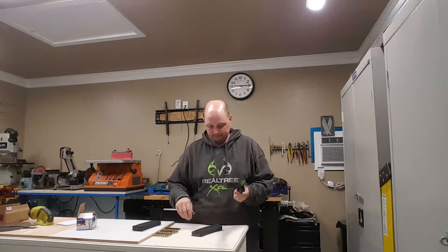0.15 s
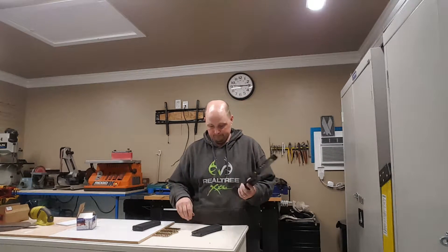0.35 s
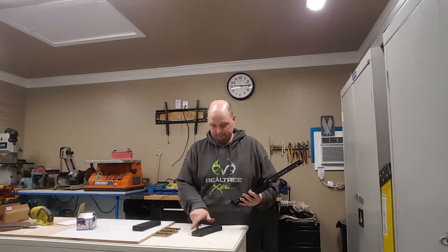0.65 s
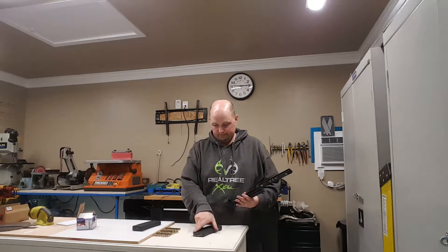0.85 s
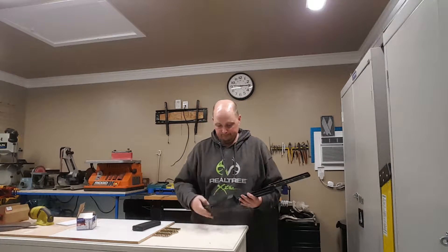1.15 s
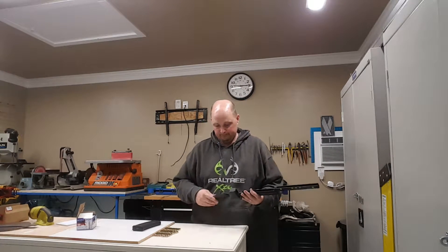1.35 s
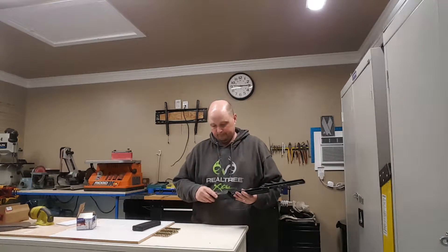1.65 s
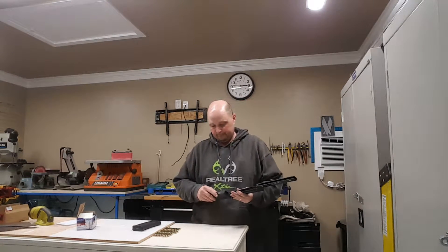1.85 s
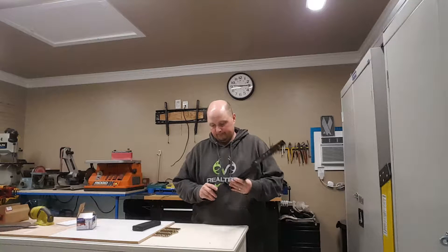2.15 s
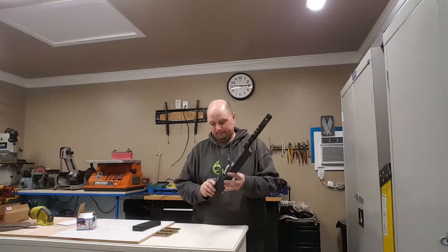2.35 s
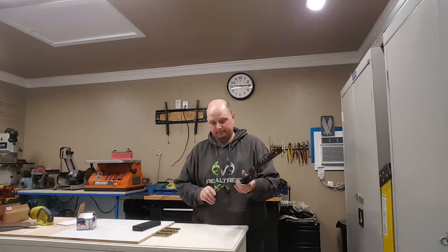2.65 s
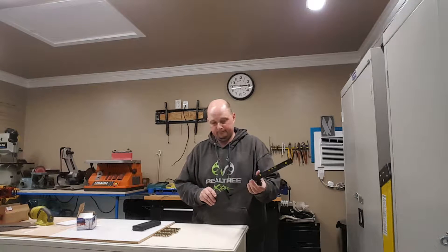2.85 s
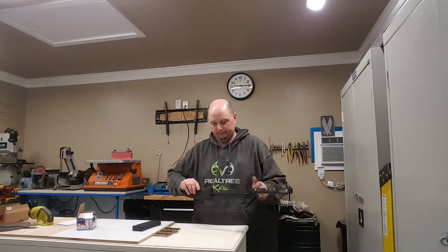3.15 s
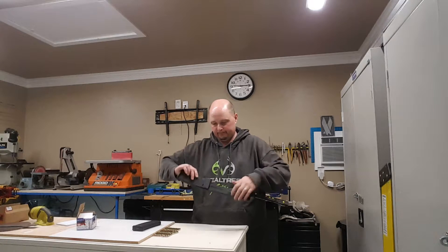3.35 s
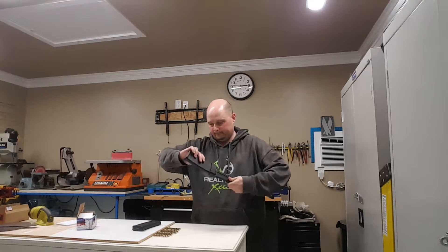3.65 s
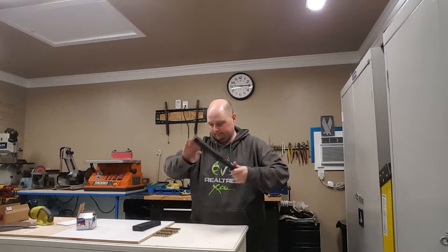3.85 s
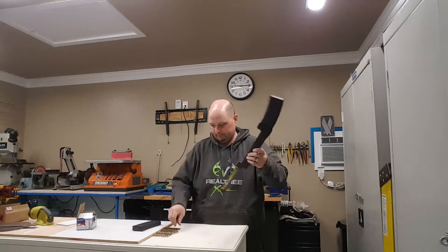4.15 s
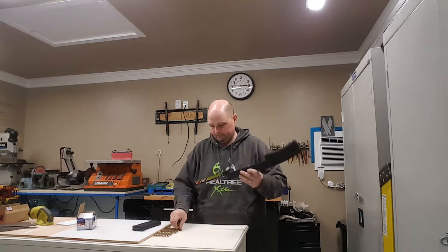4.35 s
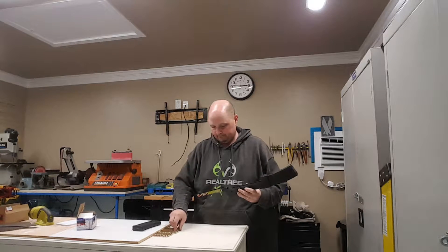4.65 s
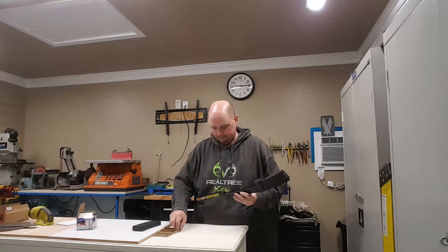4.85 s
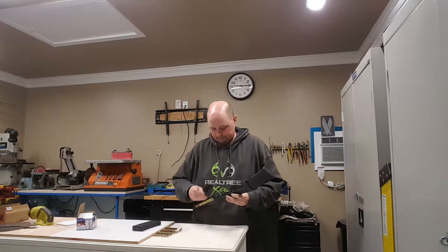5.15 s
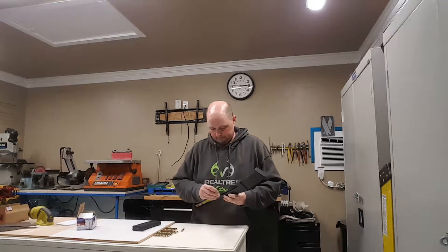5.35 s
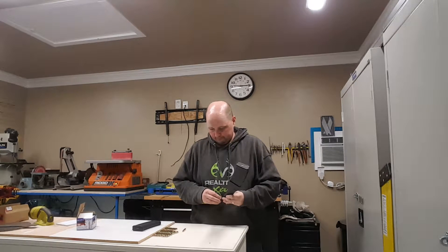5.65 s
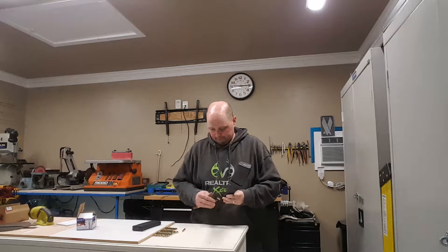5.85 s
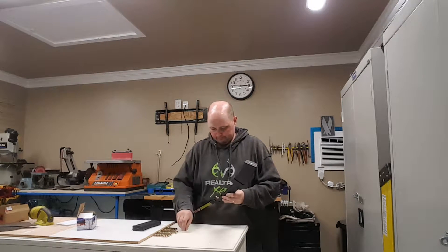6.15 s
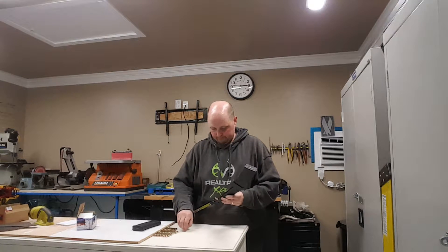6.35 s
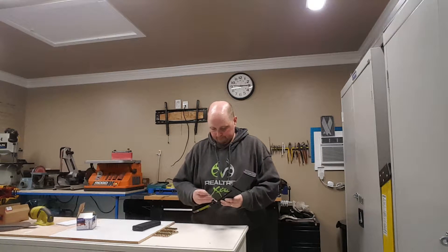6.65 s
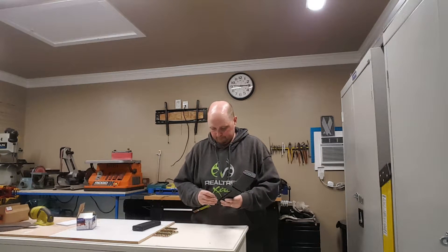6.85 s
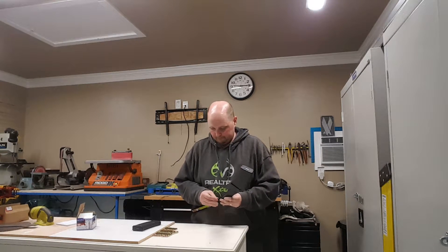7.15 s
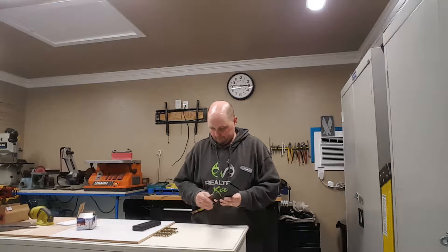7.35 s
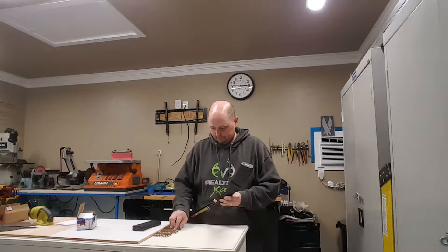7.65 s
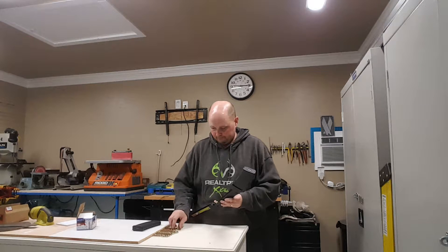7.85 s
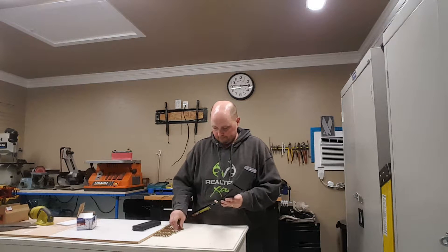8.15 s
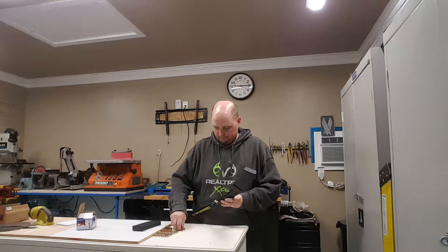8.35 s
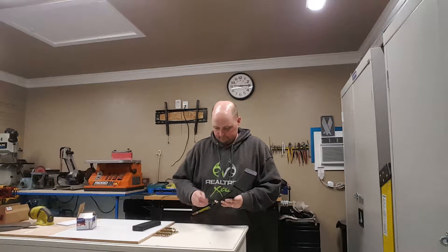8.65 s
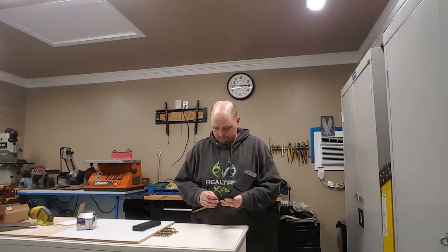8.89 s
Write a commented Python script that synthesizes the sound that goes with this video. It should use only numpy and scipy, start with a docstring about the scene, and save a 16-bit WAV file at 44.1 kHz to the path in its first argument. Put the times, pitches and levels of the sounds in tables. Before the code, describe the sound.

A rifle magazine clacks and scrapes as brass cartridges are snapped in by hand, with knocks and clinks on a workbench in a reverberant garage.

```python
"""Loading a rifle magazine in a garage

A rifle magazine is picked off a workbench, handled and loaded with brass cartridges, a few steps away.
It clacks and scrapes, rounds snap under the feed lips, loose rounds clink and knock on the bench top.
Noise bursts ring resonant bodies; a hard-walled garage rings after every contact, over a faint hum."""
import sys
import numpy as np
from scipy import signal
from scipy.fft import rfft, irfft, next_fast_len
from scipy.io import wavfile
from scipy.ndimage import map_coordinates

SR = 44100
rng = np.random.default_rng(int(sys.argv[2]) if len(sys.argv) > 2 else 0)


def inscribe(sig):
    """Save sig as 16-bit PCM at rate SR to the path in sys.argv[1].

    A 1-D sig is mono; a 2-D sig holds one channel per row.
    Samples are clipped to [-1, 1] before scaling.
    """
    pcm = np.round(np.clip(np.atleast_2d(sig).T, -1, 1) * 32767)
    wavfile.write(sys.argv[1], SR, pcm.astype(np.int16))


N = 397782
LN_60DB = np.log(1000)  # decay exponent over one t60


def amp(db):
    """Decibels to amplitude ratio."""
    return 10 ** (np.asarray(db) / 20)


def unit(x):
    """Scale to rms 1."""
    return x / np.sqrt(np.mean(x ** 2) + 1e-20)


def along(points, hz):
    """Interpolate (hz, value) points on a log frequency axis."""
    point_hz, value = np.transpose(points)
    return np.interp(np.log(hz + 1), np.log(point_hz + 1), value)


def filtered(x, response):
    """Apply a frequency-dependent gain to x."""
    n = x.shape[-1]
    padded = next_fast_len(n + SR // 10)
    hz = np.fft.rfftfreq(padded, 1 / SR)
    return irfft(rfft(x, padded) * response(hz), padded)[..., :n]


def add(track, start_s, sound):
    """Mix a stereo sound into the track at start_s."""
    start = max(0, round(start_s * SR))
    target = track[:, start:start + sound.shape[1]]
    target += sound[:, :target.shape[1]]


# left-right likeness of diffuse sound: freq_hz, coherence (0-1)
LIKENESS = [(60, 1), (150, 0.85), (280, .68), (550, 0.39), (1000, 0.11), (16000, 0.023)]


def diffuse(n):
    """Noise from all sides: alike at both microphones in the bass, unrelated in the treble."""
    def mid_side_gain(hz):
        likeness = along(LIKENESS, hz)
        return np.sqrt([(1 + likeness) / 2, (1 - likeness) / 2])

    mid, side = filtered(rng.standard_normal((2, n)), mid_side_gain)
    return np.array([mid + side, mid - side])


# room tone colour: freq_hz, relative_db
AIR_COLOUR = [(25, -17.5), (40, -8.5), (70, 7), (100, -6), (150, -0.5), (250, -6), (400, -4), (630, -8),
              (1000, -9.5), (1500, -7.5), (2000, -10.5), (3200, -11.5), (8000, -20.5), (16000, -26)]
# appliance hum partials: freq_hz, mean_level_db (rms)
HUM_PARTIALS = [(56, -66), (120, -75.5), (241, -69.5), (280, -74.5)]


def room_tone(air_db=-66):
    """Still air as coloured diffuse noise; appliance hum as sines wavering in level and phase."""
    t = np.arange(N) / SR
    air = unit(filtered(diffuse(N), lambda hz: amp(along(AIR_COLOUR, hz))))

    def waver():
        return map_coordinates(rng.standard_normal(SR // 100), [t * 6])  # 6 random points per second

    hum = np.zeros(N)
    for freq_hz, level_db in HUM_PARTIALS:
        level = np.sqrt(2) * amp(level_db + 0.56 * waver())
        hum += level * np.sin(2 * np.pi * freq_hz * t + 0.65 * waver())
    return amp(air_db) * air + hum


# garage reverberation: freq_hz, t60_s
REVERB = [(100, 0.7), (400, 0.57), (1050, 0.59), (2800, 0.54), (7000, 0.46), (11000, 0.31), (16000, .27)]
# early reflections: mean_delay_s, level_db (re direct sound)
REFLECTIONS = [(.0048, 1.5), (0.0195, -6), (0.0246, -12), (.032, -14.5)]
PORT_LAG_S = .00005  # direct sound is later at the right port, to the nearest sample


def garage(force, direct_db, build_s=0.0032):
    """Stereo paths to the microphones: direct force, near-surface reflections, decaying diffuse tail."""
    hz, t, bins = signal.stft(diffuse(SR * 3 // 4), SR, nperseg=256)
    t60_s = along(REVERB, hz)[:, None]
    decay = np.exp(-LN_60DB * t / t60_s)
    energy_norm = np.sqrt(2 * LN_60DB / t60_s / SR)
    tail = signal.istft(bins * decay * energy_norm, SR, nperseg=256)[1]
    tail *= 1 - np.exp(-np.arange(tail.shape[1]) / SR / build_s)

    early = np.zeros_like(tail)
    early[[0, 1], [0, round(PORT_LAG_S * SR)]] = 1
    for delay_s, level_db in REFLECTIONS:
        arrival = (delay_s + rng.normal(0, .0002, 2)) * SR  # separate arrival at each port
        early[[0, 1], arrival.astype(int)] += amp(level_db)
    direct = signal.fftconvolve(early, force[None], axes=1)[:, :tail.shape[1]]
    return tail + amp(direct_db) * direct


def body(spectrum, modes, tilt, size=8192):
    """Minimum-phase response of an object: broad colour with resonant peaks, tilted by the contact."""
    hz = np.fft.rfftfreq(size, 1 / SR)
    peaks = np.ones(len(hz))
    for mode_hz, width_hz, level_db in modes:
        peaks += amp(level_db) ** 2 / (1 + (2 * (hz - mode_hz) / width_hz) ** 2)
    colour = amp(along(spectrum, hz) + along(tilt, hz))
    cepstrum = irfft(np.log(colour * np.sqrt(peaks) + 1e-6))
    # fold the cepstrum so that the response is causal
    cepstrum[1:size // 2] *= 2
    cepstrum[size // 2 + 1:] = 0
    return irfft(np.exp(rfft(cepstrum)))


def excited(modes, pitch_hz, pitch_db, spread_db, width=0.12):
    """Modes one contact wakes: each at a new strength, plus a resonance of the touched part."""
    woken = [(hz, width_hz, db + rng.normal(0, spread_db)) for hz, width_hz, db in modes]
    return woken + [(pitch_hz, width * pitch_hz, pitch_db)]


def strike(response, chatter_s, direct_db, spiky=0.94):
    """One contact: dying micro-impacts (t60 chatter_s) ring an object; longer chatter fills the room later."""
    t = np.arange(SR // 25) / SR
    spikes = np.exp(spiky * rng.standard_normal(len(t)) - LN_60DB * t / chatter_s)
    force = rng.standard_normal(len(t)) * spikes
    force *= 1 - np.exp(-t / (0.085 * chatter_s))  # longer contacts close more softly
    path = garage(force / np.linalg.norm(force), direct_db, build_s=0.00086 + 0.18 * chatter_s)
    return signal.fftconvolve(response[None], path, axes=1)


def rub(strokes, response, grain_db, grain_hz, swell_db, fade):
    """Friction: tiny uneven slips ring an object; level drifts by swell_db, a share of each stroke fades."""
    out = np.zeros((2, N))
    for start_s, end_s, level_db in strokes:
        n = max(int((end_s - start_s) * SR), SR // 100)
        t = np.arange(n) / SR
        grain = map_coordinates(rng.standard_normal(SR // 10), [t * grain_hz], order=1)
        slips = unit(rng.standard_normal(n) * amp(grain_db * grain))
        level = amp(level_db + swell_db * np.linspace(-.5, .5, n))
        force = slips * level * signal.windows.tukey(n, fade)
        rung = signal.fftconvolve(force, response)
        path = garage(np.ones(1), direct_db=-2.5)
        add(out, start_s, signal.fftconvolve(rung[None], path, axes=1))
    return out


# magazine shell colour: freq_hz, level_db
SHELL_COLOUR = [(100, -23.5), (300, -17), (600, -12), (950, 0), (1350, 2), (1700, -2), (3200, 1),
                (4500, -5), (7000, -12.5), (11000, -22), (16000, -32)]
# magazine shell resonances: freq_hz, width_hz, mean_level_db
SHELL_RESONANCES = [(438, 21, 1.1), (913, 15, 3.3), (988, 10, 3.9), (1147, 6.1, 1.6), (1287, 16, 1.4),
                    (2100, 19, 1.6), (2390, 39, 1.5), (2610, 84, 4.6), (2788, 47, 2.8), (2965, 24, 3),
                    (3320, 18, 1), (3680, 11, 0.67), (3880, 58, 2.7), (4110, 41, 2.7), (5030, 8.3, 1.7),
                    (6030, 97, 3)]
HOLLOW_PER_DB = -0.55  # 2 kHz gain (dB) per dB of thud: deeper is hollower


def shell(thud_db, bite_db, edge_db, pitch_hz):
    """The magazine's answer to one contact: its resonances tilted by thud, bite and edge."""
    tilt = [(150, 0.15 * thud_db), (450, thud_db), (850, 0.019), (1500, 0.0022),
            (2000, HOLLOW_PER_DB * thud_db), (3200, bite_db), (8500, edge_db)]
    modes = excited(SHELL_RESONANCES, pitch_hz, pitch_db=4.5, spread_db=2.2)
    return body(SHELL_COLOUR, modes, tilt)


# bench top colour: freq_hz, level_db
BENCH_COLOUR = [(35, -41), (62, -4), (95, -7.5), (220, -8.5), (330, -3.5), (600, -2.5), (1450, -2),
                (1750, -15), (2200, -7), (3200, -10.5), (5000, -19), (9000, -34.5), (16000, -56.5)]
# bench top resonances: freq_hz, width_hz, mean_level_db
BENCH_RESONANCES = [(158, 9.9, 13.6), (231.5, 12.5, 18.6), (304, 16, 6.2), (440, 11, 8.7), (879, 18, 6.6),
                    (1034, 4.8, 8.8), (1390, 3.5, 1.2), (1546, 41, 7.4), (1985, 86, 8.6)]
# things dragged over the bench: start_s, end_s, level_db
BENCH_DRAGS = [(.94, 1.055, -24.5), (4.35, 4.53, -44.5), (4.87, 5.06, -35), (7.72, 7.87, -29.5),
               (7.98, 8.08, -28), (8.16, 8.39, -31.5)]
# palm sliding along the magazine: start_s, end_s, level_db
PALM_SLIDES = [(.92, 1.02, -47), (1.33, 1.45, -62.5), (1.795, 1.87, -40.5), (2.225, 2.27, -51),
               (2.33, 2.38, -54), (2.63, 2.76, -42.5), (3.56, 3.85, -60.5), (4.05, 4.2, -65.5)]


def handling():
    """Friction rings the bench top under dragged things, and the shell under the sliding palm."""
    top = body(BENCH_COLOUR, BENCH_RESONANCES, [(90, -11.5), (250, -5.5), (1200, -1.5), (5000, -9)])
    skin = body(SHELL_COLOUR, SHELL_RESONANCES, [(1000, 6.5), (3500, -0.5), (11000, 15.0)])
    drag = rub(BENCH_DRAGS, top, grain_db=3, grain_hz=142, swell_db=1.5, fade=0.26)
    slide = rub(PALM_SLIDES, skin, grain_db=4.5, grain_hz=213, swell_db=-1.5, fade=.45)
    return drag + slide


# magazine, fingers and rounds meeting the bench:
# time_s, level_db, thud_db, hardness_db, pitch_hz (touched part)
BENCH_KNOCKS = [(0.744, -16, 12.5, -17, 228), (0.836, 6, 11, -10, 457), (.852, 14, 1, 5.5, 845),
                (0.961, -18, 5, -2, 1520), (1.004, 8, 2, 1, 1060), (4.302, -9, 12, -3, 435),
                (4.555, 6.5, -9, -1.5, 2880), (4.798, -10.5, 11.5, 0, 428), (4.922, 0, 3, -4, 970),
                (5.046, 5.5, 3.5, 1, 840), (5.0641, 20.5, -7.5, 6.5, 1810), (6.139, 9.5, 4, -9.5, 1950),
                (6.344, -2.5, 7, 0, 441), (6.414, 8.5, -11.5, -1, 1990), (7.703, 5.5, 4, 7, 2760),
                (7.786, 16, -7.5, 1, 2440), (7.925, 2, 16.5, 1, 304), (8.004, 0, -6, 6, 1040),
                (8.237, 6, 2.5, -1, 675), (8.3, 6.5, 3.5, 5.5, 2670)]
KNOCK_CHATTER_S = 0.016
KNOCK_MID_DB, KNOCK_EDGE_DB = 0.5, -2  # at 800 Hz; at 6 kHz re hardness
SETTLE_S, SETTLE_DB = .03, -8.5  # hand comes to rest after each knock


def bench(level_db=-2):
    """Fingers thump the bench top, brass and the magazine rap on it; a softer contact follows each."""
    out = np.zeros((2, N))
    for time_s, knock_db, thud_db, hardness_db, pitch_hz in BENCH_KNOCKS:
        tilt = [(260, thud_db), (800, KNOCK_MID_DB), (2000, 0),
                (2900, hardness_db), (6000, hardness_db + KNOCK_EDGE_DB)]
        for delay_s, loss_db in [(0, 0), (SETTLE_S, SETTLE_DB)]:
            modes = excited(BENCH_RESONANCES, pitch_hz, pitch_db=6.5, spread_db=1.2)
            top = body(BENCH_COLOUR, modes, tilt)
            knock = strike(top, KNOCK_CHATTER_S, direct_db=-12.0)
            add(out, time_s + delay_s, amp(knock_db + loss_db + level_db) * knock)
    return out


# cartridge case colour: freq_hz, level_db
CASE_COLOUR = [(1000, -6.5), (3500, -8.5), (7500, -2), (9500, -8), (16000, -15)]
# cartridge case modes: nominal_hz, width_hz, base_level_db
CASE_MODES = [(7700, 230, 7.3), (8110, 140, 19.3), (8300, 120, 8.6), (12000, 80, 8.2), (12290, 95, 9.2),
              (16000, 330, 9)]
# brass against brass: time_s, level_db, ring_db, upper_modes_db
CASE_CLINKS = [(4.335, -10, 0, 1), (4.381, -3.5, -5.5, -3), (4.48, -13.5, -4, -5), (4.568, -6, -11, 29.5),
               (4.923, 3, -9, -2), (5.066, 0.5, -3, -3), (7.706, -13, 3.5, -15), (7.978, -2, -1, -4),
               (8.1143, 10, -8.5, 9)]
CASE_SPREAD = 0.005  # relative tuning deviation between clinks (standard deviation)
CLINK_BRIGHT_DB, BRIGHT_PER_RING = 1, 0.96  # 11.5 kHz: offset, dB per dB of ring


def cartridges(level_db=-2):
    """Loose cases touch and ring high and thin; the point of contact decides which modes speak."""
    out = np.zeros((2, N))
    for time_s, clink_db, ring_db, upper_db in CASE_CLINKS:
        tune = 1 + rng.normal(0, CASE_SPREAD)
        modes = []
        for nominal_hz, width_hz, mode_db in CASE_MODES:
            mode_db = mode_db + ring_db + upper_db * (nominal_hz > 10000) + rng.normal(0, 0.67)
            modes.append((nominal_hz * tune, width_hz, mode_db))
        tilt = [(8400, 0), (11500, CLINK_BRIGHT_DB + BRIGHT_PER_RING * ring_db)]
        clink = strike(body(CASE_COLOUR, modes, tilt), chatter_s=0.017, direct_db=-7.5)
        add(out, time_s, amp(clink_db + level_db) * clink)
    return out


# magazine against hand, part or round:
# time_s, level_db, thud_db, brightness_db, pitch_hz (touched part), rebound_db
MAGAZINE_CLACKS = [(1.322, -2, 6.5, -9, 1410, 0), (1.373, -2.5, 6, -22, 1280, 1.5),
                   (1.567, 17.5, 6.5, -10.5, 1944, 1), (1.849, 18.5, 11, -9.5, 2850, -18),
                   (2.229, -9, 14, -15.5, 1305, -11.5), (2.377, -8.5, 13, -15, 800, -13.5),
                   (2.551, 7.5, 5.5, -0.5, 3160, -8), (2.74, 1.5, -4, -0.5, 1540, -16.5),
                   (3.106, -8.5, 21, -11, 1307, -12), (3.531, 1.5, -1.5, -16, 1540, -18),
                   (3.591, 0.5, 3.5, -13.5, 1180, -12), (3.799, -1, 2, -12, 1404, -11),
                   (5.416, 12.5, 5.5, 3, 1300, -28), (5.512, 10.5, -1, -2, 1210, -28.5),
                   (5.611, 5, -2, -20, 1300, -4), (5.879, 3, 4.5, -6, 966, -30),
                   (6.7921, 16.5, 1, 1.5, 2140, -8), (6.94, 6, 1.5, -11, 1190, -6.5),
                   (8.8675, 8.5, 0, 2.5, 2100, -1.5), (8.95, 2.5, 4, -5, 1300, -18)]
CLACK_CHATTER_S = 0.02
REBOUND_S, REBOUND_CHATTER_S = .024, .028
REBOUND_THUD_DB, REBOUND_BRIGHT_DB = 5, 1  # re first contact
BITE_DB, BITE_PER_DB = -1, .5  # 3 kHz: offset, dB per dB of brightness


def magazine(level_db=-3):
    """Contacts clack the shell; the loose part strikes once more, with a deeper thud."""
    out = np.zeros((2, N))
    for time_s, clack_db, thud_db, bright_db, pitch_hz, rebound_db in MAGAZINE_CLACKS:
        bite_db = BITE_DB + BITE_PER_DB * bright_db
        first = shell(thud_db, bite_db, bright_db, pitch_hz)
        second = shell(thud_db + REBOUND_THUD_DB, bite_db, bright_db + REBOUND_BRIGHT_DB, pitch_hz)
        clack = strike(first, CLACK_CHATTER_S, direct_db=-10, spiky=0.92)
        rebound = strike(second, REBOUND_CHATTER_S, direct_db=-11.5, spiky=0.43)
        add(out, time_s, amp(clack_db + level_db) * clack)
        add(out, time_s + REBOUND_S, amp(clack_db + rebound_db + level_db) * rebound)
    return out


# rounds pushed under the feed lips:
# snap_s, level_db, brightness_db, pitch_hz, push_s (duration), scrape_db
ROUND_SNAPS = [(2.7985, 18, 13, 4600, 0.26, -33.5), (5.6532, 17, 5.5, 2650, 0.037, -39),
               (7.1847, 17.5, 17, 2320, 0.013, -27)]
SNAP_THUD_DB, SNAP_BITE_DB = -3, 2  # at 450 Hz; 3 kHz offset
SNAP_CHATTER_S = .01
SEAT_S, SEAT_DB, SEAT_CHATTER_S = 0.026, -6, .016  # spring throws the round back up against the lips
PUSH_SWELL_DB = 6  # scrape growth, start to end


def loading(level_db=-3):
    """A round scrapes down between the feed lips, snaps past with a treble bite, and seats."""
    pushes = [(snap_s - push_s, snap_s, scrape_db) for snap_s, _, _, _, push_s, scrape_db in ROUND_SNAPS]
    scraped = body(SHELL_COLOUR, SHELL_RESONANCES, [(1000, -11.5), (4000, -2.0), (10000, 3.0)])
    out = rub(pushes, scraped, grain_db=2.5, grain_hz=383, swell_db=PUSH_SWELL_DB, fade=0.19)
    for snap_s, snap_db, bright_db, pitch_hz, _, _ in ROUND_SNAPS:
        ring = shell(SNAP_THUD_DB, SNAP_BITE_DB + BITE_PER_DB * bright_db, bright_db, pitch_hz)
        snap = strike(ring, SNAP_CHATTER_S, direct_db=-7.5, spiky=1.0)
        seat = strike(ring, SEAT_CHATTER_S, direct_db=-13.5)
        add(out, snap_s, amp(snap_db + level_db) * snap)
        add(out, snap_s + SEAT_S, amp(snap_db + SEAT_DB + level_db) * seat)
    return out


def scene():
    """Room tone, then all strokes and contacts in the garage."""
    return room_tone() + handling() + bench() + cartridges() + magazine() + loading()


# microphone pair imbalance: freq_hz, left_minus_right_db
PORT_COLOUR = [(100, 3.5), (400, 0), (800, -2.5), (3200, -3.5), (5000, -1), (8000, 0), (9500, 8.5),
               (12000, 6), (15500, 4.5)]
TOP_HZ = 16200  # middle of a 500 Hz wide cutoff


def record(dry):
    """Two ports colour the sound differently; peaks are rounded and the band is limited."""
    heard = filtered(dry, lambda hz: amp(np.outer([.5, -.5], along(PORT_COLOUR, hz))))
    rounded = heard / (1 + (heard / .85) ** 4) ** .25
    return filtered(rounded, lambda hz: np.clip((TOP_HZ - hz) / 500 + .5, 0, 1))


dry = scene()
out = record(dry)
inscribe(out)
```